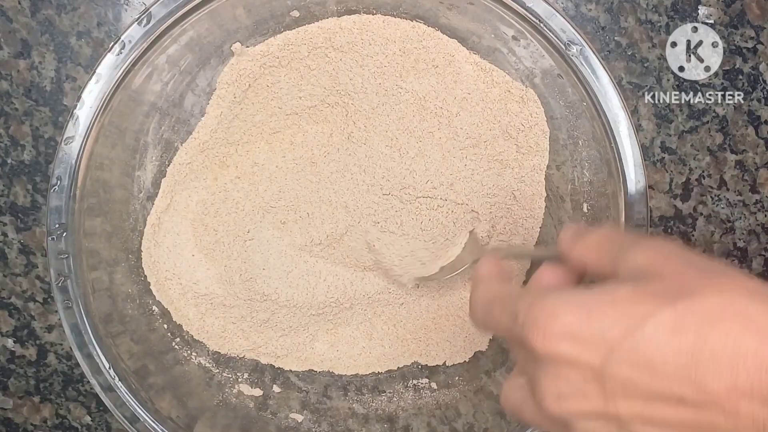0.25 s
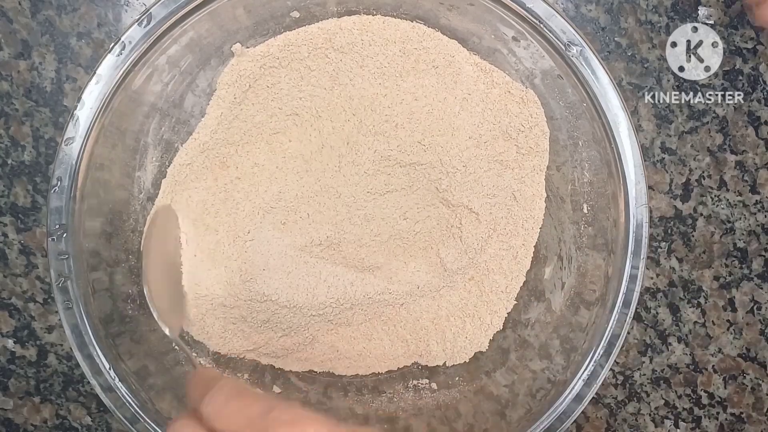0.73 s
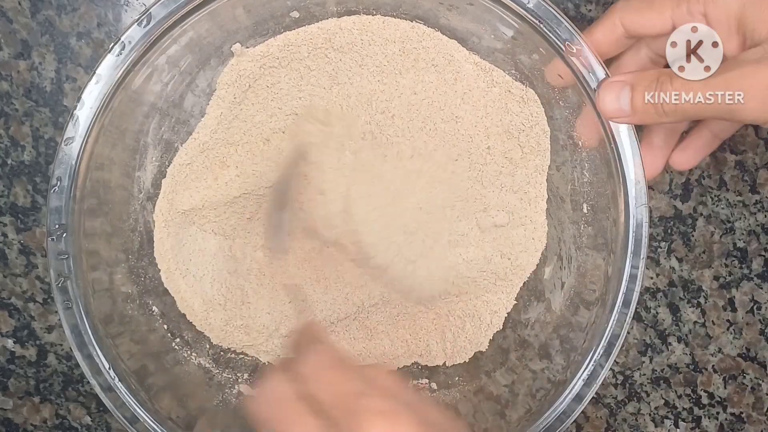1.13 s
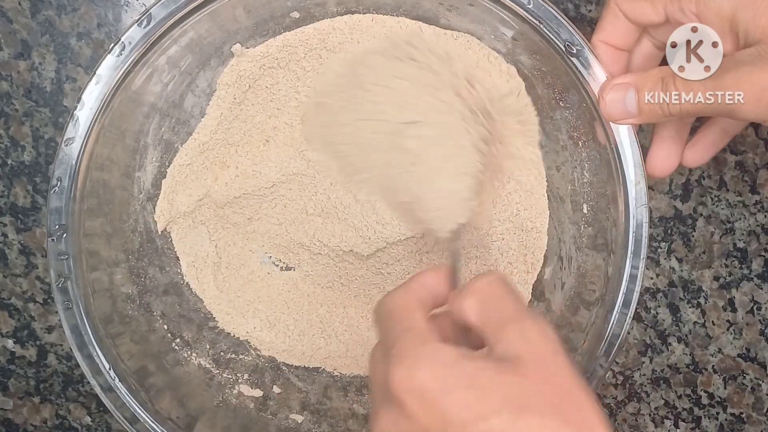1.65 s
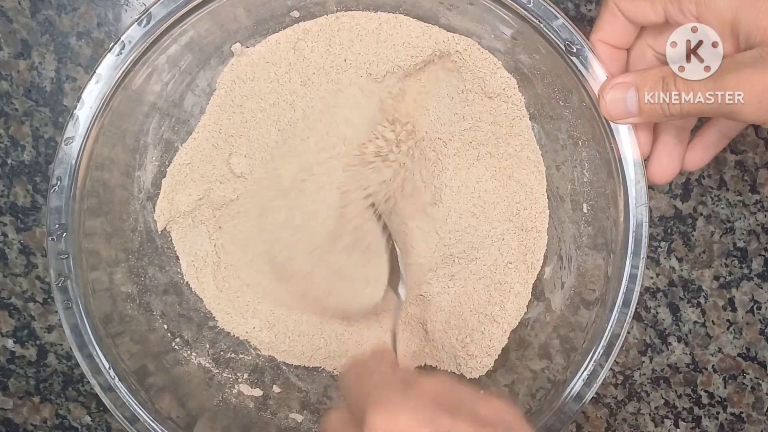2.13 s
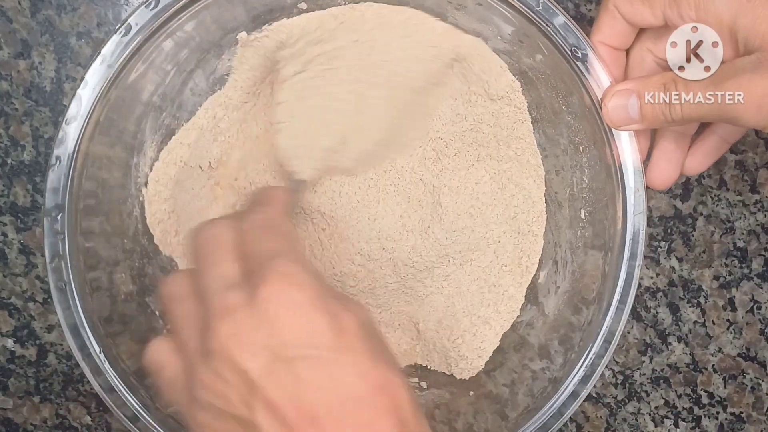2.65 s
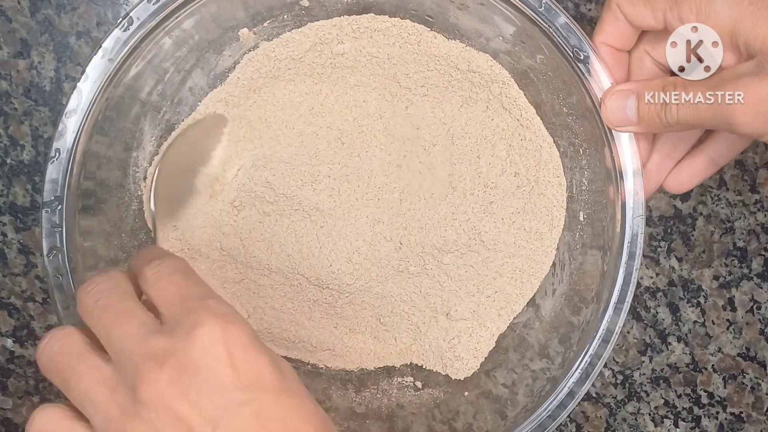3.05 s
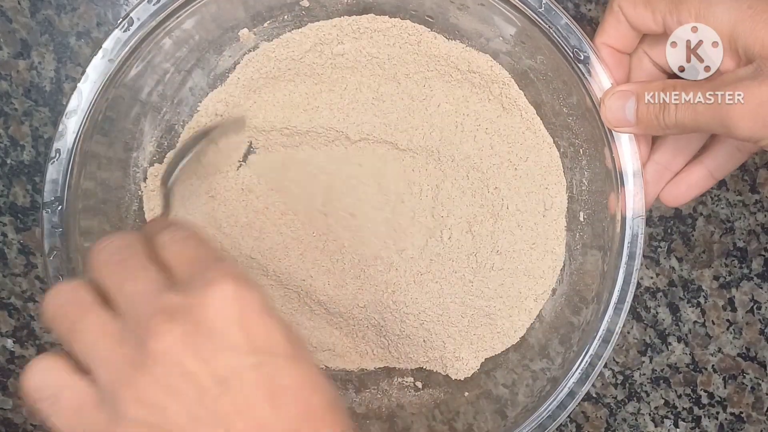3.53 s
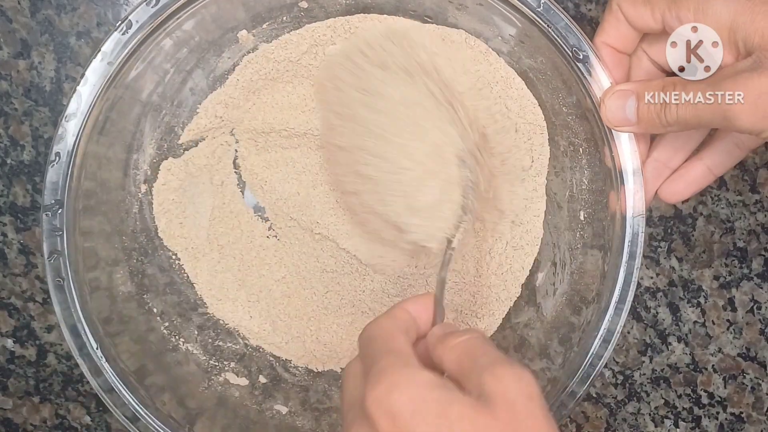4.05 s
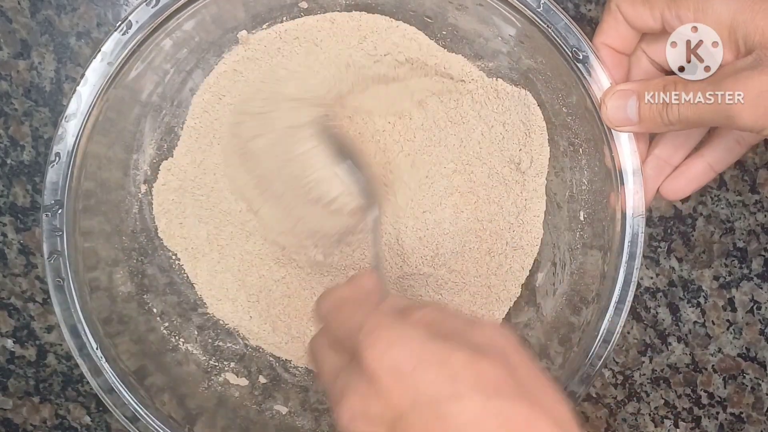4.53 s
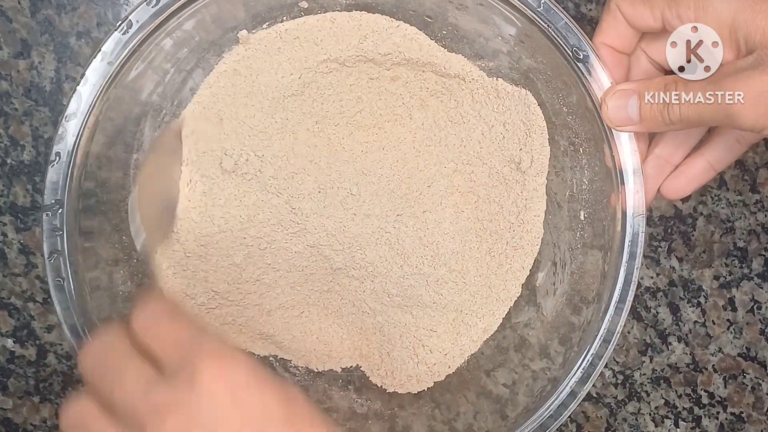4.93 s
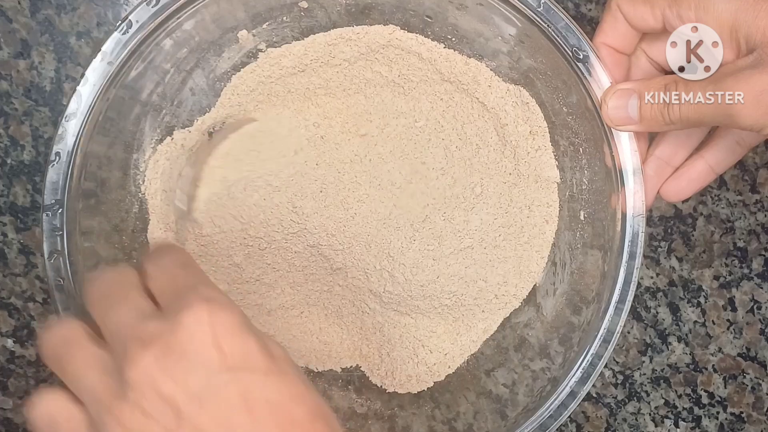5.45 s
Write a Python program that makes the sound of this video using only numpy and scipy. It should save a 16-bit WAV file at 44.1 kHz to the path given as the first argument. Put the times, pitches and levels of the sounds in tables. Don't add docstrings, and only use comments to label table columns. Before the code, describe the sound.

Muffled irregular spoon strokes crunch through powder in a glass bowl, with small knocks and a ringing hit, over a low fridge hum.

```python
import sys
import numpy as np
from scipy import signal
from scipy.fft import rfft, irfft, next_fast_len
from scipy.io import wavfile
from scipy.ndimage import uniform_filter1d

SR = 44100
rng = np.random.default_rng(int(sys.argv[2]) if len(sys.argv) > 2 else 0)


def gain_from_db(level_db):
    decades = np.asarray(level_db, float) / 20
    return 10 ** decades


def int16_out(signal):
    q = np.round(np.clip(np.atleast_2d(signal).T, -1, 1) * 32767)
    wavfile.write(sys.argv[1], SR, q.astype(np.int16))


N = 251325
STEP = 16

# (frequency [Hz], level [dB per Hz])
KITCHEN_COLOUR = [(20, -65), (42, -21), (65, -6.5), (86, -16), (124, -7), (150, -16), (280, -17.5),
                  (450, -34.5), (700, -36), (1500, -45.5), (3500, -52.5), (5500, -53), (9000, -55.5),
                  (16200, -52.5)]
# (frequency [Hz], width [Hz], level [dB], likeness left-right [0-1])
FRIDGE_HUM = [(59.34, 0.905, -49, .99), (120.96, 8, -55, 0.93), (132, 14.5, -57.5, .95),
              (197.8, 5.2, -66.5, 1), (413, 33.5, -72.5, 0.98), (2860, 35, -87, 0), (6750, 640, -76, 0)]
# (time [s], length [s], level [dB])
BOWL_ROCKS = [(0.494, 0.22, -51), (0.902, .05, -34), (1.578, 0.074, -38), (2.124, .02, -40),
              (2.616, 0.13, -34.5), (2.898, 0.029, -51), (3.132, 0.023, -35.5), (3.6, 0.23, -48),
              (5.04, 0.093, -39.5), (5.653, .04, -44.5)]
ROCK_RISE_DB_PER_S, ROCK_FALL_DB_PER_S = 254, 196
# (time [s], peak level [dB], frequency [Hz], half length [s])
BOWL_SETTLES = (1.105, -50, 430, .022)

ROOM_T60_S, ROOM_DB = 0.29, -2
PORT_LAG_S = 0.00013

# (time [s], peak level [dB], chatter [ms], crack over ring [dB],
# share of the free ring time [0-1])
RIM_HITS = [
    (0.2573, -39, 45, -32, 0.71),
    (4.3271, -14, 45, -13, 0.84),
]
RIM_HZ = [424, 1026, 1105, 1159, 1990, 2149, 2225, 2300, 3350, 3378, 3455, 3560, 4731, 5250, 6172, 6210,
          6275, 7127, 7779, 8457, 9360, 10280, 11030, 11650, 13200, 13950]
# (level in the light touch [dB], level in the blow [dB], time to fall 60 dB [s])
RIM_TONES = [(-37, -12.5, 0.58), (-25, -9, 0.18), (-21, -14, 0.41), (-19, -9.5, 0.48), (-15, -22, 0.49),
             (-2, -9.5, 0.46), (-1.5, -40.5, 0.28), (-31, -40, 0.26), (-7, -9.5, .3), (-28, -13.5, 0.62),
             (-22, -6.5, 0.34), (-38, -13.5, 0.28), (-15, -12, .2), (-35, -10, 0.035), (-32, -12.5, .42),
             (-34, -12, 0.53), (-20, -10.5, 0.24), (-35, -10, 0.054), (-24, -16, 0.19), (-35, -17.5, 0.15),
             (-23, -10, 0.12), (-24, -20, .15), (-30, -26, 0.15), (-35, -28, 0.13), (-40, -17, 0.06),
             (-37, -20.5, 0.19)]
HAND_DAMP_S = 0.39

# (time [s], peak level [dB], pitch [Hz], crack over knock [dB])
TICKS = [(0.603, -45.5, 1450, -6), (0.873, -23, 2450, -10), (0.962, -25.5, 970, -9), (1.286, -37, 1190, -4),
         (1.295, -38, 4900, -8), (1.3065, -26, 2600, -6), (1.355, -29, 890, -13), (1.374, -32, 2580, -13),
         (1.431, -26, 1080, -8), (1.586, -37.5, 3420, 5), (2.0868, -15, 2160, -5), (2.6165, -25, 1700, -12),
         (2.645, -21.5, 1200, -10), (3.095, -43, 1130, 0), (3.1265, -36, 2300, 2), (3.215, -28, 2460, -14),
         (3.584, -20, 4700, -6), (3.7199, -13.5, 3070, -3.5), (3.765, -17.5, 973, -25),
         (3.837, -35.5, 1060, 2), (4.47, -24, 1750, -20), (4.997, -32.5, 950, -2), (5.05, -22, 1680, -30),
         (5.131, -31.5, 990, -5.5), (5.452, -39.5, 1210, 8), (5.519, -24, 2620, -11),
         (5.547, -17.5, 2490, -17), (5.645, -28, 4230, -28)]
TICK_T60_S, TICK_CYCLES = 0.009, 6
CRACK_S = 0.0019

MUFFLED_HZ = [370, 500, 600, 860, 1060, 1160, 1650, 2000, 2610, 3360, 3600, 4930, 5700, 6100, 7260, 8000,
              9560, 10400, 11750, 13200, 13900]
# (width [Hz], level over the broad grit [dB])
MUFFLED = [(35.3, 8.4), (43.8, 6.6), (50, 1.3), (70.5, 6.64), (80, 6.2), (60, 1.5), (150, 5.2),
           (147.5, 4.4), (133, 8.2), (82, 6.3), (130, 3.4), (150, 6.4), (149, 6.4), (150, 4.5), (181, 7.5),
           (180, 3.2), (145, 2.3), (171.5, 2.4), (170, 9.4), (170, 7.1), (151.5, 6.2)]
# (frequency [Hz], level [dB per Hz])
GRIT_COLOUR = [(150, 4), (280, -5), (600, 0), (1100, -2.5), (1450, -9.5), (2600, -7), (3100, -6.5),
               (4300, -12), (6000, -12.5), (9000, -11), (10600, -8), (11800, -7.5), (13000, -10),
               (16500, -12)]
# (time [s], drag [s], pressure [dB],
# edge rasp over pressure [dB], grit over pressure [dB])
DIGS = [(0.869, 0.077, -48, -1.5, 5), (1.287, .12, -44.5, -16, 0), (2.079, 0.037, -35.5, -21, -26),
        (3.094, 0.067, -47, -14.5, -6), (3.582, 0.047, -38, -28, -4), (4.329, 0.034, -26.5, -5.5, -4.5),
        (4.995, 0.049, -45, -4, -1), (5.449, 0.035, -42, -14, -11)]
# (time [s], drag [s], pressure [dB],
# edge rasp over pressure [dB], grit over pressure [dB])
PUSHES = [(0.95, 0.028, -44.5, -6, -6), (1.36, 0.023, -58, -8, 11), (1.43, 0.046, -44.5, 2, 2.5),
          (1.5, 0.076, -52, -2.5, 0.5), (1.579, 0.028, -48.5, -3.5, 0), (2.086, 0.0019, -37, 3.5, 4),
          (2.549, 0.06, -50.5, -12, 6.5), (2.615, 0.035, -45, 1, 0), (2.69, 0.053, -52, -4.5, -11),
          (3.188, 0.044, -48, -8, 4), (3.65, 0.059, -47, -5.5, 8), (3.713, 0.011, -45.5, -4, 10),
          (3.756, 0.012, -42, -14, -10), (3.79, 0.087, -50, -12, 0.5), (3.9, 0.078, -54, -1, 2),
          (4.439, 0.024, -39.5, -1.5, 3), (5.045, 0.034, -49, -5, -4.5), (5.12, 0.012, -41, -3, -6.5),
          (5.517, .045, -43, -5.5, 4), (5.58, 0.061, -54.5, 0.5, -6), (5.65, .05, -62.5, 11, -5)]
# (time [s], slide [s], hiss [dB],
# coarse grains over hiss [dB])
SPILLS = [(0.59, 0.084, -67, -5), (0.81, .03, -71, -8), (0.85, 0.018, -56, -9.5), (1.105, 0.027, -64, -8),
          (2.02, 0.034, -74, -16), (2.068, .012, -57, -1), (2.43, 0.031, -76, -11),
          (2.535, .02, -61.5, -13), (2.8, .13, -69, -12), (3.1, .15, -57.5, -20), (3.416, .03, -65, -18),
          (3.59, 0.4, -55, -21.5), (4.954, .006, -84, -20), (4.985, .012, -62.5, -11)]
DIG_ATTACK_S, PUSH_ATTACK_S = (0.0067, 0.015, 0.0092, 0.0018), (0.0064, 0.011, 0.0071, 0.011)
RELEASE_DB_PER_S = (200, 227, 236, 239)
HISS_DB, HISS_SHARE = -3, 0.4
SPLASH_SHARE, SPLASH_S = 0.63, 0.007
SPILL_RISE_DB_PER_S, SPILL_FALL_DB_PER_S = 206.5, 221
SPILL_RUMBLE_DB, SPILL_RASP_DB = -2, -9.5
SWEPT_DB = -16


def unit(x):
    return x / np.sqrt(np.mean(x ** 2))


def gain_at(points, size):
    hz, db = np.transpose(points)
    return gain_from_db(np.interp(np.log(np.fft.rfftfreq(size, 1 / SR) + 1), np.log(hz), db))


def colour(x, points):
    size = next_fast_len(N)
    return irfft(rfft(x, size) * gain_at(points, size), size)[..., :N]


def band(x, lo_hz, hi_hz, order=2):
    return signal.sosfilt(signal.butter(order, [lo_hz, hi_hz], "band", fs=SR, output="sos"), x)


def ring(x, hz, width_hz):
    return signal.lfilter(*signal.iirpeak(hz, hz / width_hz, fs=SR), x)


def walk(rate):
    k = int(SR / rate)
    steps = np.repeat(rng.standard_normal(N // k + 1), k)
    return unit(uniform_filter1d(uniform_filter1d(steps, k), k)[:N])


def pair(like):
    like = np.clip(like, 0, 1)
    mid, side = rng.standard_normal((2, N))
    return np.sqrt((1 + like) / 2) * mid + np.sqrt((1 - like) / 2) * side * np.array([[1], [-1]])


def add(out, s, sound):
    i = int(s * SR)
    out[..., i:i + sound.shape[-1]] += sound[..., :N - i]


def late(x, share=1):
    return np.array([x, np.roll(x, round(share * PORT_LAG_S * SR))])


def steady(x, window_s):
    return x / np.sqrt(uniform_filter1d(np.mean(x ** 2, axis=0), int(window_s * SR)) + 1e-12)


def swell(s, hold_s, rise, fall):
    t = np.arange(N)[::STEP] / SR
    return -rise * np.maximum(s - t, 0) - fall * np.maximum(t - s - hold_s, 0)


def fine(gain):
    return np.array([np.interp(np.arange(N), np.arange(N)[::STEP], g) for g in gain])


def kitchen():
    air = band(pair(0.86), 12, 284) + band(pair(0.18), 302.5, 18000)
    air = unit(colour(air, KITCHEN_COLOUR)) * gain_from_db(-53 + 0.5 * walk(0.72))

    hum = 0
    for hz, width_hz, db, like in FRIDGE_HUM[1:]:
        hum = hum + gain_from_db(db) * unit(ring(ring(pair(like), hz, width_hz), hz, width_hz))
    hz, wander_hz, db, like = FRIDGE_HUM[0]
    motor_phase = 2 * np.pi * np.cumsum(hz + wander_hz * walk(5)) / SR
    motor = gain_from_db(db + 3 + 0.26 * walk(5.4)) * np.sin(motor_phase)

    shake = 0
    for s, lasts_s, db in BOWL_ROCKS:
        shake = shake + gain_from_db(db + swell(s, lasts_s, ROCK_RISE_DB_PER_S, ROCK_FALL_DB_PER_S))
    counter = unit(ring(pair(0.93), 128.6, 16.8)) * fine([shake]) * gain_from_db(-9)

    settle_s, settle_db, settle_hz, half_s = BOWL_SETTLES
    t = np.arange(N) / SR - settle_s
    settle = gain_from_db(settle_db) * np.sin(2 * np.pi * settle_hz * t) * np.exp(-(t / half_s) ** 2)
    return air + hum + motor + counter + settle


def room(x):
    t = np.arange(SR // 2) / SR
    noise = rng.standard_normal((2, len(t))) * (t > 0.003)
    low = band(noise, 170, 7200, order=1) * gain_from_db(-60 * t / ROOM_T60_S)
    high = band(noise, 3900, 17000, order=2) * gain_from_db(-60 * t / (0.73 * ROOM_T60_S))
    tail = low + high
    tail = tail / np.sqrt(np.sum(tail ** 2) / 2)
    return gain_from_db(ROOM_DB) * signal.fftconvolve(x.mean(axis=0)[None], tail, axes=1)[:, :N]


def rim():
    out, t = np.zeros((2, N)), np.arange(SR // 2) / SR
    for k, (s, db, chatter_ms, crack_db, free) in enumerate(RIM_HITS):
        chatter = rng.standard_normal((2, len(t))) * np.exp(-t * 1000 / chatter_ms)
        crack = band(rng.standard_normal((2, len(t))), 600, 15000, order=1) * np.exp(-t / 0.014)
        sound = gain_from_db(crack_db) * crack
        for hz, tone in zip(RIM_HZ, RIM_TONES):
            width_hz = np.log(1000) / np.pi / (free * tone[2])
            long_ring = ring(chatter, hz, width_hz)
            touched_ring = ring(chatter, hz, 7 * width_hz)
            for part, part_db in (long_ring, -10), (touched_ring, -15):
                sound += gain_from_db(tone[k] + part_db) * part / abs(part).max(axis=1, keepdims=True)
        add(out, s, gain_from_db(db - 20 * (t / HAND_DAMP_S) ** 3) * sound)
    return out


def ticks():
    out, t = np.zeros((2, N)), np.arange(3000) / SR
    for s, db, hz, crack_db in TICKS:
        crack = band(rng.standard_normal(len(t)), 1600, 15000, order=1) * np.exp(-t / CRACK_S)
        crack = crack + sum(gain_from_db(-8 + g) * ring(crack, f, 2.4 * w) for f, (w, g) in zip(MUFFLED_HZ, MUFFLED))
        fade = np.exp(-np.log(1000) * t / (TICK_T60_S + TICK_CYCLES / hz))
        knock = np.sin(2 * np.pi * hz * t) * fade * (1 - np.exp(-3 * hz * t))
        tick = knock + gain_from_db(crack_db + 6.5) * crack / abs(crack).max()
        add(out, s, gain_from_db(db - 5.0) * late(tick, 0.4) * gain_from_db([[-1.5], [0]]))
    return out


def drag(s, hold_s, db, rasp_db, grit_db, attack_s, splash):
    since = np.maximum(np.arange(N)[::STEP] / SR - s, 0)
    levels = db + np.array([0, rasp_db, grit_db, HISS_DB + HISS_SHARE * grit_db])
    shape = []
    for level, release, attack in zip(levels, RELEASE_DB_PER_S, attack_s):
        onset = 1 - np.exp(-since / max(attack, 1e-4))
        shape.append(gain_from_db(level + swell(s, hold_s, 0, release)) * onset)
    shape[3] = shape[3] * gain_from_db(-splash * rasp_db * np.exp(-since / SPLASH_S))
    return np.square(shape)


def spill(s, slide_s, db, coarse_db):
    level = db + np.array([[coarse_db + SPILL_RUMBLE_DB], [coarse_db + SPILL_RASP_DB], [coarse_db], [0]])
    slide = swell(s, slide_s, SPILL_RISE_DB_PER_S, SPILL_FALL_DB_PER_S)
    moving = (np.arange(N)[::STEP] / SR > s) | (coarse_db > SWEPT_DB)
    return gain_from_db(level + slide) ** 2 * moving


def controls():
    power = sum(drag(*row, DIG_ATTACK_S, SPLASH_SHARE) for row in DIGS)
    power = power + sum(drag(*row, PUSH_ATTACK_S, 0) for row in PUSHES)
    power = power + sum(spill(*row) for row in SPILLS)
    return fine(np.sqrt(power))


def scrape():
    size_db = 2.5 * np.minimum(rng.exponential(size=N), 2.5)
    crystals = (rng.random(N) < 1200 / SR) * gain_from_db(size_db) * rng.standard_normal(N)
    crumble_db = 3.7 * band(np.abs(unit(crystals)), 30, 300, order=1).clip(-2, 2)
    grains = unit(crystals) * gain_from_db(-2.5) + rng.standard_normal(N)
    scatter = gain_from_db(2.0 + crumble_db) * rng.standard_normal((2, N))
    grains = late(grains) + scatter

    bowl = grains
    for hz, (width_hz, db) in zip(MUFFLED_HZ, MUFFLED):
        bowl = bowl + (gain_from_db(db) - 1) * ring(grains, hz, width_hz) * gain_from_db(7.8 * walk(25))

    size = next_fast_len(N)
    bins = rfft(bowl, size) * gain_at(GRIT_COLOUR, size)
    octave = np.log2(np.fft.rfftfreq(size, 1 / SR) / 200 + 1e-9)
    layers = np.zeros((4, 2, N))
    crunch_db = 2.47 * walk(90)
    for k in range(14):
        part = irfft(bins * np.clip(1 - abs(2 * octave - k), 0, 1), size)[:, :N]
        layer = (k > 5) + (k > 6) + (k > 9)
        layers[layer] += part * gain_from_db(crunch_db + 3.75 * walk(40))

    since = np.arange(N) / SR - RIM_HITS[1][0]
    bare_db = -13 * np.exp(-np.maximum(since, 0) / 0.16) * (since > 0)
    pan_db = -2.1 + 1.0 * walk(7.8)
    heard = sum(steady(layer, 0.035) * gain * gain_from_db(-0.52) for layer, gain in zip(layers, controls()))
    return heard * gain_from_db(bare_db + np.array([pan_db, -pan_db]) / 2)


def scene():
    strokes = scrape()
    hits = ticks() + rim()
    return strokes + hits + room(gain_from_db(-4) * strokes + hits) + kitchen()


def band_limit(x):
    return signal.sosfilt(signal.butter(12, 16360, fs=SR, output="sos"), x)


def record(dry):
    top_cut = signal.ellip(8, 0.2, 40, 15350, fs=SR, output="sos")
    mix = signal.sosfilt(top_cut, dry)
    return band_limit(mix)


dry = scene()
out = record(dry)
int16_out(out)
```